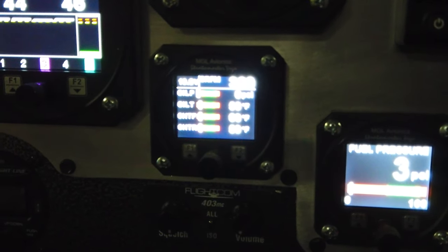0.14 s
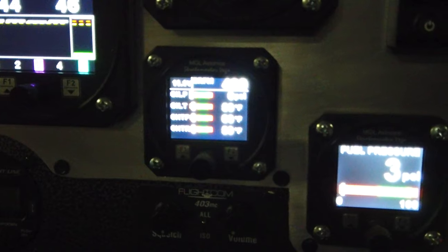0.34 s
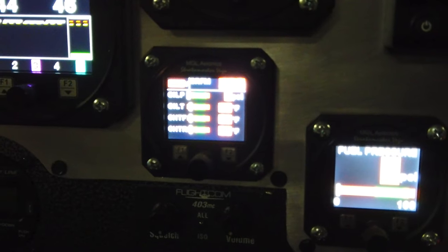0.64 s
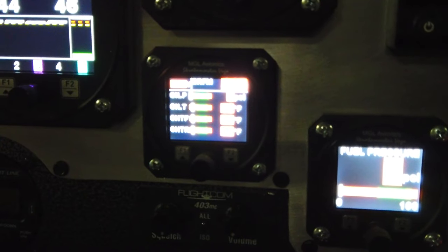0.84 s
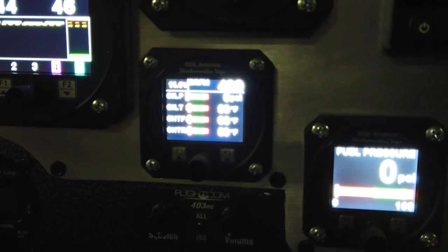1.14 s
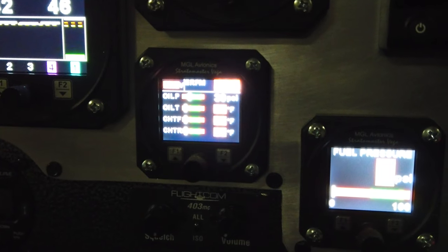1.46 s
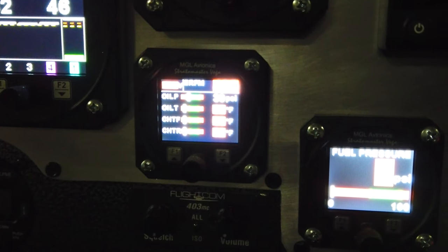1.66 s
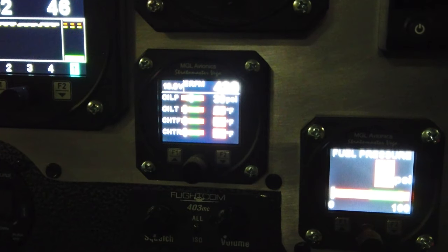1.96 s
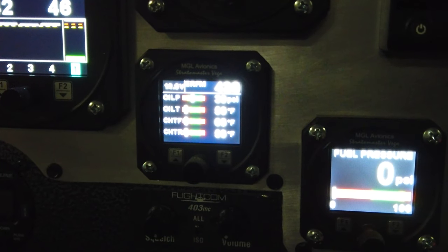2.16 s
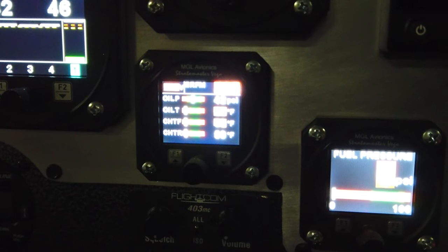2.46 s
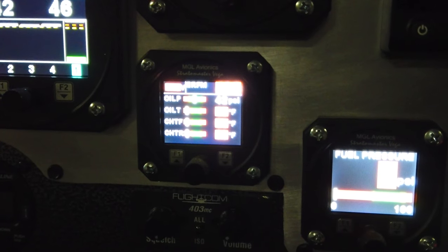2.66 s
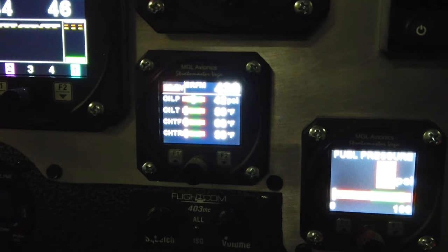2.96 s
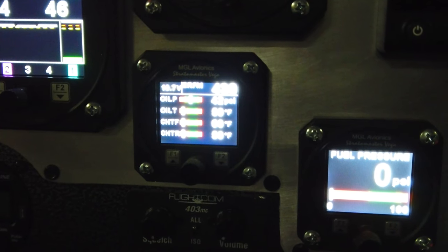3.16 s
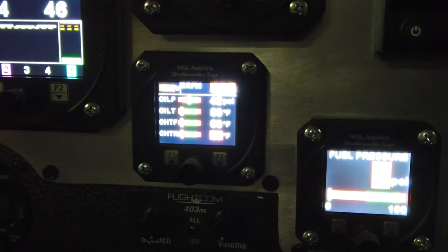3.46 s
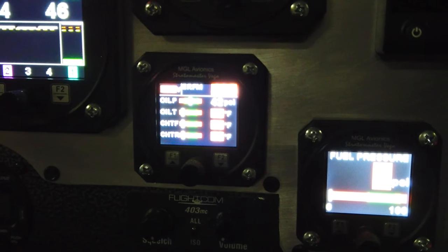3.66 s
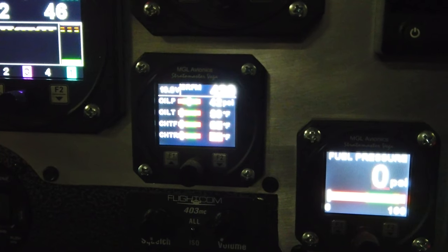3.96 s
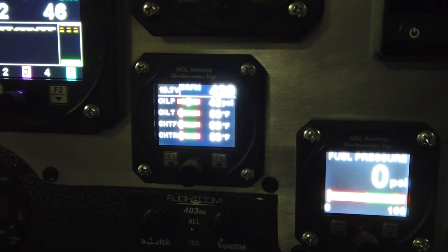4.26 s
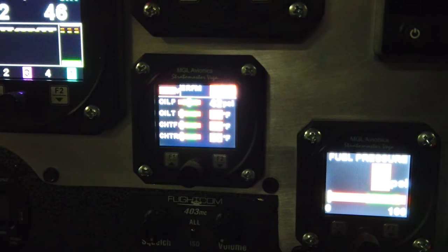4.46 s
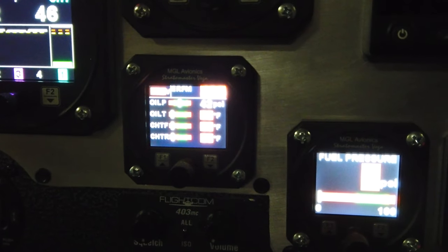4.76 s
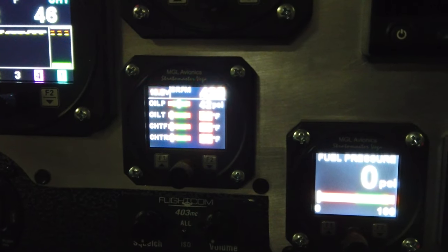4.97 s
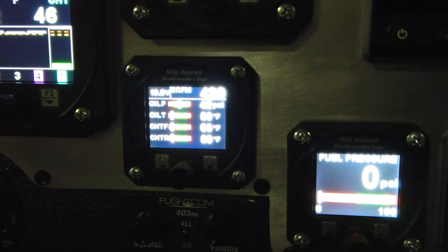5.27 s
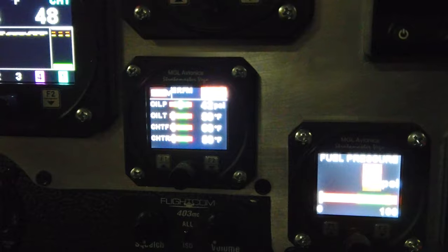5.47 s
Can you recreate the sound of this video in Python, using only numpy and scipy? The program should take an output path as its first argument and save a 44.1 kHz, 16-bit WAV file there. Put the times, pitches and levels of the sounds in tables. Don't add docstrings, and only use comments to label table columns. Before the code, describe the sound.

An aircraft piston engine is turned over by its electric starter but never fires, heard close from inside the cockpit in a hangar. At 0 s the pinion slams into mesh with a short metallic clank and a low boom ringing for under a second. The cranking begins slower and the whine lower, catching up by about 0.4 s. From there to 5.5 s it churns without pause: deep compression thumps at roughly fourteen to fifteen per second, felt as a fluttering throb, while a rough gear whine around 1.6 kHz dips with every stroke. Hollow panel rattle, metallic housing ringing, airy hiss and tiny valve ticks pulse along. The sound fills out over the first couple of seconds and the pace eases very slightly. At about 5.54 s a brief, bright switch click cuts the drive, and the gears just start to sag. Bass is central; whine and hiss spread wide, with short reverberation.

```python
import sys
import numpy as np
from scipy import signal
from scipy.fft import rfft, irfft, next_fast_len
from scipy.io import wavfile
from scipy.ndimage import uniform_filter1d

SR = 44100
rng = np.random.default_rng(int(sys.argv[2]) if len(sys.argv) > 2 else 0)


def linear_from_db(decibels):
    return 10 ** (np.asarray(decibels, float) / 20)


def wrap_up_sound(samples):
    columns = np.atleast_2d(samples).T
    tamed = np.clip(columns, -1, 1)
    steps = np.round(tamed * 32767).astype(np.int16)
    wavfile.write(sys.argv[1], SR, steps)


N = 247442
T = np.arange(N) / SR
SWITCH_OFF_S = 5.5375

# share of the stroke, tooth rate in Hz,
# tooth load in dB, hiss in dB.
STROKE_CYCLE = [(.07, 1500, 2, 4), (.18, 1492, 3.5, -1.5), (.26, 1599, -6, 1.5), (.42, 1663, -10.5, -1.5),
                (.55, 1664, 0, 1.5), (.68, 1660, 1.5, 2), (.82, 1635, 2, 1.5), (.95, 1562, 4, -2)]
# order in cycles per stroke, sign, level at rest in dB rms, time built up in seconds,
# level then in dB rms, level at the end in dB rms.
THUMP_ORDERS = [(2, 1, -23.5, 1.62, -18.5, -22), (3, 1, -38, .8, -27, -25.5), (4, 1, -29, 1.35, -27, -52),
                (5, 1, -32.5, 1.05, -26, -25), (6, -1, -38.5, 3.9, -29.5, -29)]
# cycles per stroke, level in dB rms.
WEAK_TONES = [(1, -66), (1.29, -32.5), (6.59, -39), (6.8, -45), (7, -44.5), (7.25, -51), (8, -46.5),
              (8.25, -69), (9, -50.5), (10, -74), (11, -49.5), (12, -48), (13, -54)]
# multiple of the tooth rate, level in dB.
TOOTH_OVERTONES = [(1, 2), (2, -12.5), (3, -21), (4, -26.5), (5, -16), (6, -19.5)]
# multiple of the tooth rate, level in dB.
SHAFT_TONES = [(1 / 3, -17.5), (.5, -20.5), (2 / 3, -11), (4 / 3, -18), (1.5, -17.5)]
# pitch in Hz, width in Hz, level in dB, shakes per stroke,
# share of the stroke at the shake, depth in dB.
HOUSING_RINGS = [(1500, 47, -7, 1, 0.23, 3.8), (1659, 47, -5, 1, 0.2, 5.7), (1698, 41, -3, 2, 0.15, 2.8),
                 (3032, 170, -8.5, 2, 0.22, 2.4), (3252, 130, -7.5, 2, 0.33, 1.5),
                 (4915, 150, -10.5, 2, 0.61, 1.5), (6200, 340, -8, 2, 0.9, 0.77),
                 (6653, 73, -10, 1, 0.69, 4.7), (7400, 130, -13, 1, .98, 2), (8410, 130, -13, 1, 0.85, 3.2),
                 (9660, 200, -12.5, 1, .02, 1), (10460, 260, -15.5, 1, 0.028, 4.8)]
# pitch in Hz, width in Hz, level in dB, shakes per stroke,
# share of the stroke at the shake, depth in dB.
PANEL_RINGS = [(172.3, 22, -6.5, 1, 0.57, 3), (264.4, 34, -10, 1, 0.22, 1.5), (350.6, 30, -10, 1, 0.58, 1),
               (430, 23.4, -10.5, 1, 0.68, 3), (566.3, 40, -3, 1, 0.67, 5), (685.5, 18, -9.5, 1, 0.56, -2),
               (800.3, 94, -3, 1, 0.82, 3.5), (1052, 81, -1, 2, 0.11, 5), (1332, 40, -7, 1, 0.27, 8.5),
               (2086, 41, -12.5, 1, 0.89, 7.5), (2160, 30, -12, 1, 0.81, 1), (2400, 75, -10.5, 1, 0.99, 4),
               (2566, 38, -14, 1, 0.94, 7)]
# frequency in Hz, level in dB per Hz.
AIR_COLOUR = [(100, -21), (133, -22.5), (308, -28.5), (553, -32), (940, -25.5), (1640, -25.5),
              (1890, -30.5), (3210, -33.5), (4200, -40), (5450, -41.5), (7410, -34), (11200, -45.5),
              (15750, -47.5), (15950, -90)]
# start in seconds, pitch in Hz, level in dB,
# time to fall 60 dB in seconds.
JOLT_RINGS = [(.02, 57, -25, 1), (0.041, 80, -19.5, 0.93), (-.01, 1120, -21, 0.18), (0, 900, -35, 0.36),
              (0, 2200, -28, 0.24), (.06, 7240, -32, 0.47), (.25, 105, -33, 0.48)]
# pitch in Hz, width in Hz, level in dB,
# time to fall 60 dB in seconds.
SWITCH_RINGS = [(299.6, 68, -24, 0.09), (2350, 610, -21, 0.11), (8980, 900, -29, 0.049),
                (10100, 680, -24, .09), (12240, 1800, -23, 0.087), (14500, 1510, -31, .05)]
# frequency in Hz, side minus mid in dB.
SIDE_COLOUR = [(60, -39), (110, -82), (200, -24), (380, -19), (700, -17), (1290, -11.5), (2380, -2),
               (4400, 2.5), (8120, -2), (15000, 0.5)]


def strokes():
    rate = 14.083 + .6641 * np.exp(-T / 1.97)
    rate -= 5.0889 / (1 + np.exp((T - .2656) / .0644))
    return .7292 + np.cumsum(rate) / SR


def thump(angle):
    turn = 2 * np.pi * (angle - .5)
    mounts = .45
    cabin = .017 * angle - .75
    cylinders = np.cos(turn / 4 + 2.9)
    propeller = np.cos(turn / 5.0 + 1.44)
    out = np.zeros(N)
    for order, db in WEAK_TONES:
        out += linear_from_db(db) * np.cos(order * turn + rng.uniform(0, 2 * np.pi))
    for order, sign, rest_db, built_s, built_db, end_db in THUMP_ORDERS:
        db = np.interp(T, [0, built_s, T[-1]], [rest_db, built_db, end_db]) - coast()
        uneven = linear_from_db(-52.5) * (0.82 * cylinders + 2.5 * propeller) + linear_from_db(-39) * wander(hz=9)
        phase = order * turn - mounts * (order % 2) - cabin * (order > 3)
        out += ((sign * linear_from_db(db) + uneven) * np.exp(1j * phase)).real
    return np.sqrt(2) * out


def gears(angle, shift):
    late_angle = angle - np.interp(T, [.1, .3], [.62, 0])
    speed = 1 - .29 * np.exp(-T / .085) - 0.052 * coast()
    teeth = 2 * np.pi * np.cumsum(through_stroke(late_angle, column=1) * speed) / SR
    load_db = through_stroke(late_angle, column=2)
    load_db += 0.26 * np.cos(2 * np.pi * angle / 4 + 0.62)
    pinion = 1 + 0.21 * np.cos(teeth / 12.4) + 0.18 * np.cos(teeth / 8.6) + 0.21 * np.cos(teeth / 28)
    wear = 1 + .45 * wander(hz=150)
    whine = np.zeros(N)
    for k, db in TOOTH_OVERTONES:
        strength = linear_from_db(db + load_db * k ** 0.11) * speed ** (1.4 * (k - 1))
        whine += strength * (wear * np.exp(1j * (k * teeth + shift))).real
    shaft = sum(linear_from_db(db) * np.cos(k * teeth + shift) for k, db in SHAFT_TONES)
    housing = linear_from_db(-3.5) * speed ** 8 * shaken(HOUSING_RINGS, late_angle)
    level_db = load(first_db=-32, gain_db=3, bite_db=8, coast_db=-3) - 1.5
    return linear_from_db(level_db) * (evened(whine * pinion) + shaft * wear.real + housing)


def panels(angle):
    level_db = load(first_db=-35, gain_db=3, bite_db=9.5, coast_db=-0.5) - 1.0
    return linear_from_db(level_db) * shaken(PANEL_RINGS, angle)


def hiss(angle):
    swell = linear_from_db(0.81 * through_stroke(angle, column=3) + 0.24 * np.cos(2 * np.pi * angle / 4 + 1.0))
    tick_now = rng.random(N) < 120 * swell ** 2 / SR
    ticks = tick_now * linear_from_db(3.4 * np.minimum(rng.exponential(1, N), 4))
    tick_fade = signal.lfilter([1], [1, -np.exp(-1 / (0.0047 * SR))], ticks)
    highpass = signal.butter(2, 5000, "high", fs=SR, output="sos")
    bright = signal.sosfilt(highpass, rng.standard_normal(N))
    air = evened(colour(swell * rng.standard_normal(N) + 0.33 * tick_fade * bright, AIR_COLOUR))
    return linear_from_db(load(first_db=-39, gain_db=2.5, bite_db=-1, coast_db=-1) + 6) * air


def jolt():
    out = np.zeros(N)
    for start_s, hz, db, t60 in JOLT_RINGS:
        rise = np.clip((T - start_s) / 0.019, 0, 1)
        rough = 1 + .4 * wander(hz=hz / 8).real
        out += linear_from_db(db - 60 * T / t60) * rise * np.sin(2 * np.pi * hz * T) * rough
    return out


def switch():
    t = np.maximum(T - SWITCH_OFF_S, 0)
    ring = np.zeros(N)
    for hz, width, db, t60 in SWITCH_RINGS:
        steady = (width < hz / 4) * (hz < SR / 100)
        tone = (steady + 0.84 * wander(hz=width)) * np.exp(2j * np.pi * hz * t)
        ring += linear_from_db(db - 60 * t / t60) * tone.real
    return ring * np.minimum(t / .002, 1)


def coast():
    return np.clip((T - SWITCH_OFF_S) / .07, 0, 1)


def load(first_db, gain_db, bite_db, coast_db):
    growth = gain_db * (1 - np.exp(-T / 2.16))
    return first_db + growth + bite_db * np.exp(-T / 0.022) + coast_db * coast()


def through_stroke(angle, column):
    rows = np.array(STROKE_CYCLE)
    return uniform_filter1d(np.interp(angle % 1, rows[:, 0], rows[:, column], period=1), size=161)


def shaken(rings, angle):
    out = np.zeros(N)
    for hz, width, db, per_stroke, at, depth in rings:
        ring = wander(hz=width)
        ring = ring / (abs(ring) + .1) ** .25
        shake_db = depth * np.cos(2 * np.pi * per_stroke * (angle - at))
        out += linear_from_db(db + shake_db) * (ring * np.exp(2j * np.pi * hz * T)).real
    return evened(out)


def wander(hz):
    step = 8
    r = np.exp(-np.pi * hz * step / SR)
    noise = rng.standard_normal(2 * (N // step + 2)).view(complex)
    z = signal.lfilter([1], [1, -2 * r, r * r], noise)
    return np.interp(np.arange(N) / step, np.arange(len(z)), z / np.sqrt(np.mean(abs(z) ** 2)))


def evened(x):
    return x / np.sqrt(np.mean(x ** 2) + 1e-20)


def colour(x, points):
    hz, db = np.transpose(points)
    size = next_fast_len(N)
    f = np.fft.rfftfreq(size, 1 / SR)
    gain = linear_from_db(np.interp(np.log(f + 1), np.log(hz + 1), db))
    return irfft(rfft(x, size) * gain, size)[:N]


def hangar(x, wet_db):
    at = np.arange(200, SR // 2, 22)
    at = at + rng.integers(0, 22, len(at))
    tail = np.zeros(SR // 2 + 22)
    tail[at] = rng.choice([-1., 1.], len(at)) * linear_from_db(-60 * at / SR / 0.37)
    tail *= linear_from_db(wet_db) / np.linalg.norm(tail)
    tail[0] = 1
    return signal.oaconvolve(x, tail / np.linalg.norm(tail))[:N]


def scene():
    angle = strokes()
    bass = thump(angle) + jolt()
    machine = gears(angle, shift=0) + panels(angle) + hiss(angle)
    mid = bass + hangar(machine, wet_db=-11) + switch()
    other_machine = gears(angle, shift=np.pi / 2) + panels(angle) + hiss(angle)
    other = hangar(other_machine, wet_db=-19) + switch()
    late = signal.hilbert(mid, next_fast_len(N))[:N].imag
    side = colour(-0.3 * late + 0.87 * other, SIDE_COLOUR)
    return np.array([mid + side, mid - side])


def band_limit(x):
    return signal.sosfilt(signal.butter(12, 15890, fs=SR, output="sos"), x)


def record(dry):
    return band_limit(dry)


dry = scene()
out = record(dry)
wrap_up_sound(out)
```